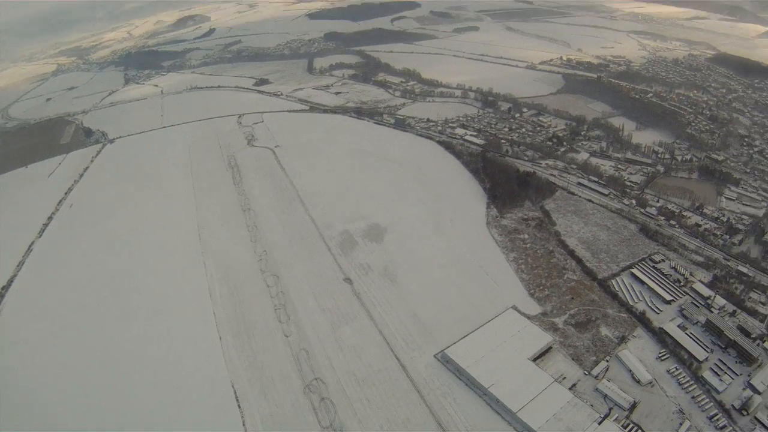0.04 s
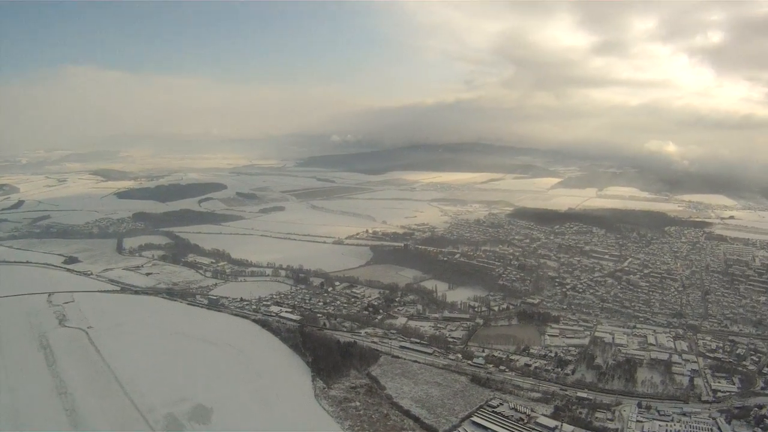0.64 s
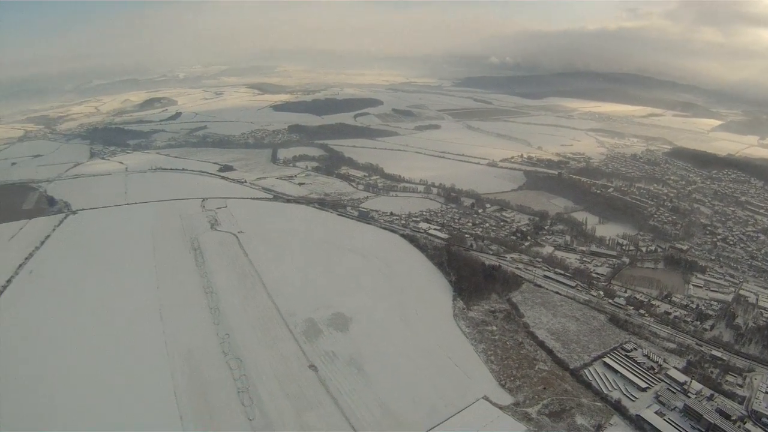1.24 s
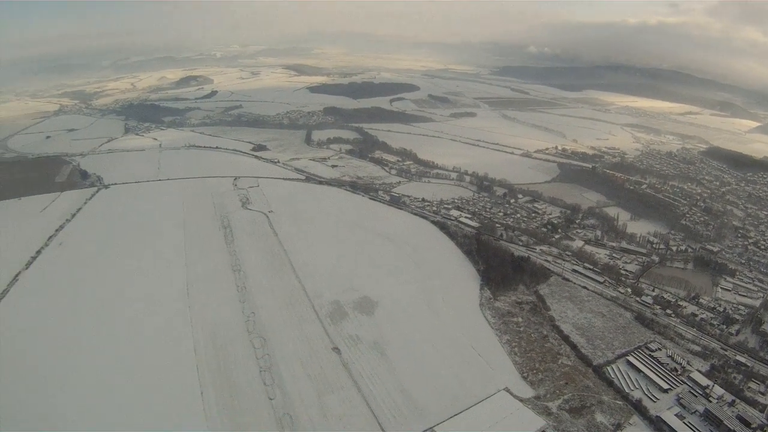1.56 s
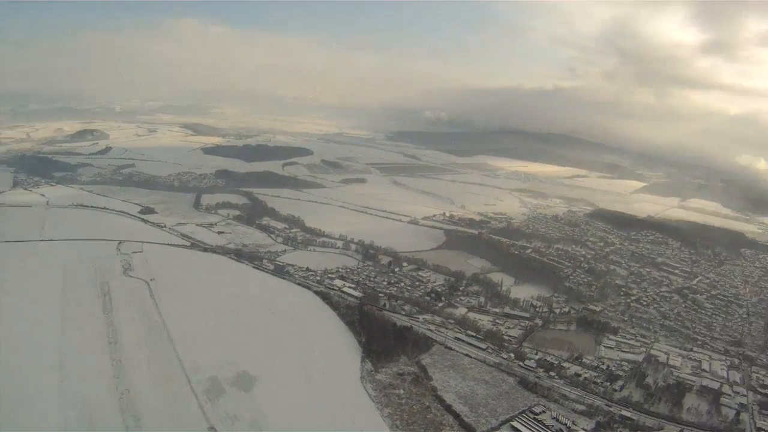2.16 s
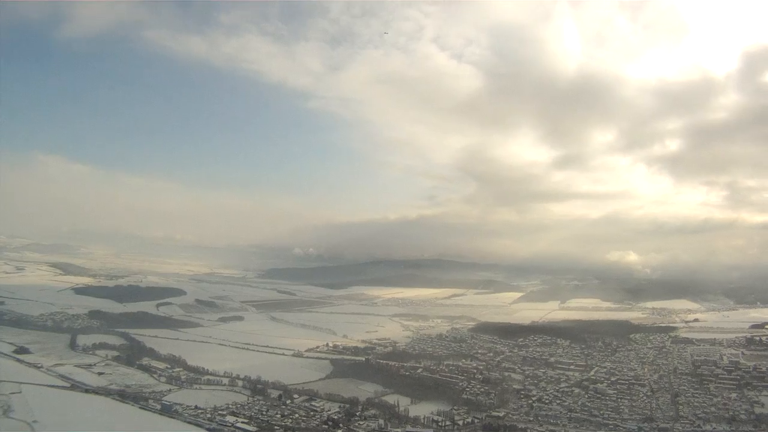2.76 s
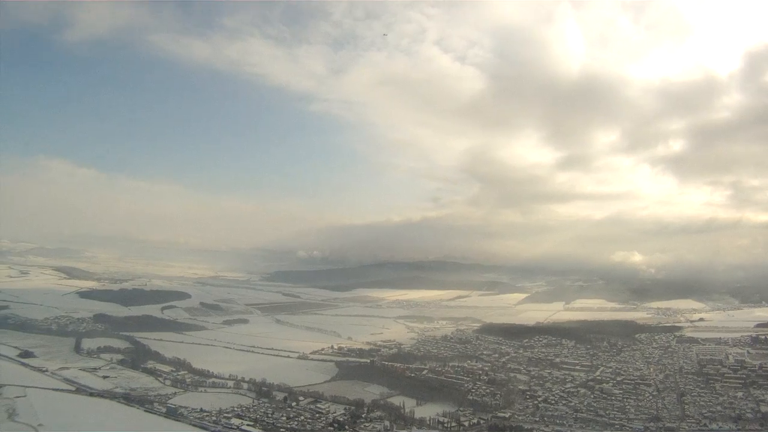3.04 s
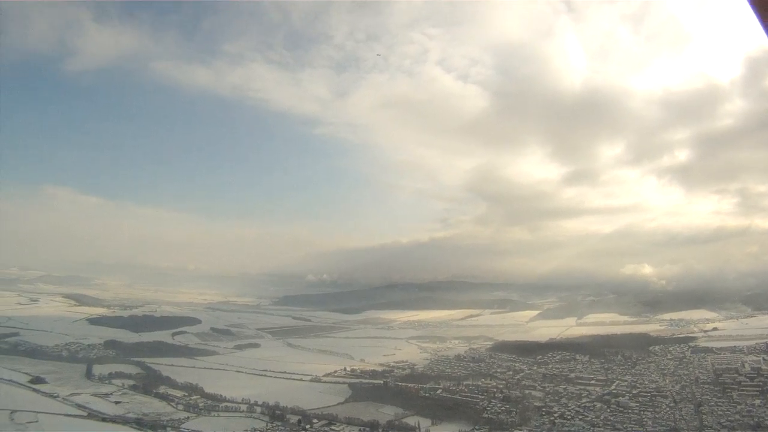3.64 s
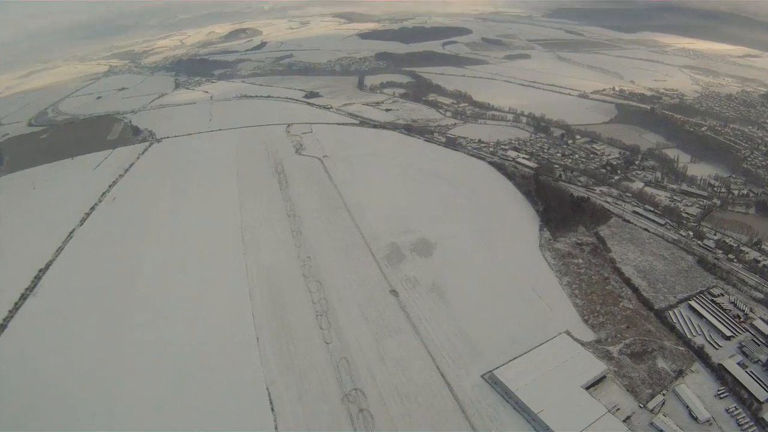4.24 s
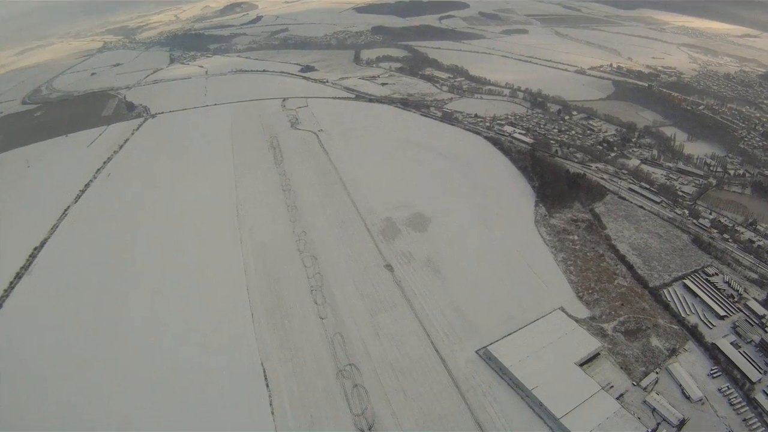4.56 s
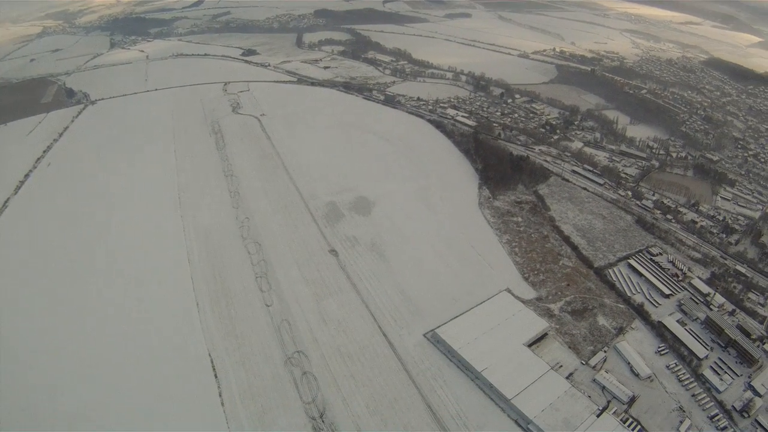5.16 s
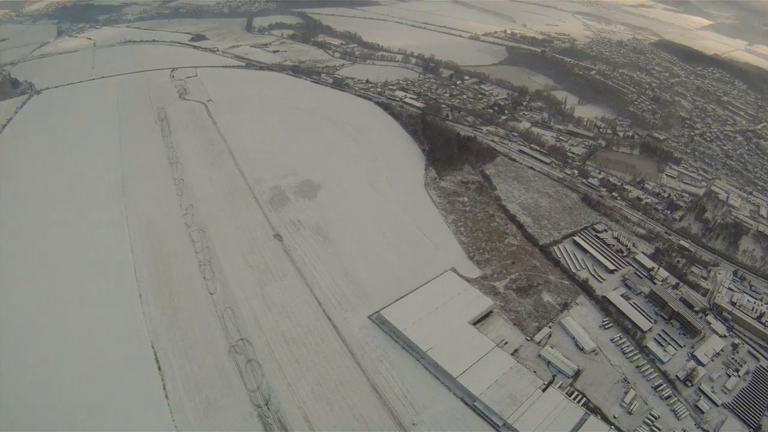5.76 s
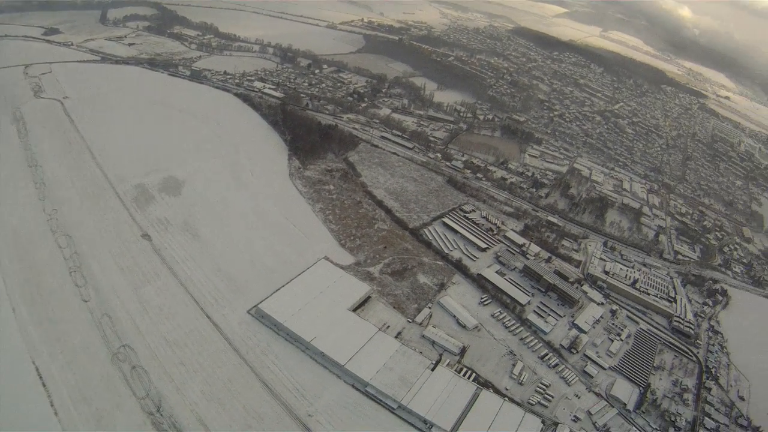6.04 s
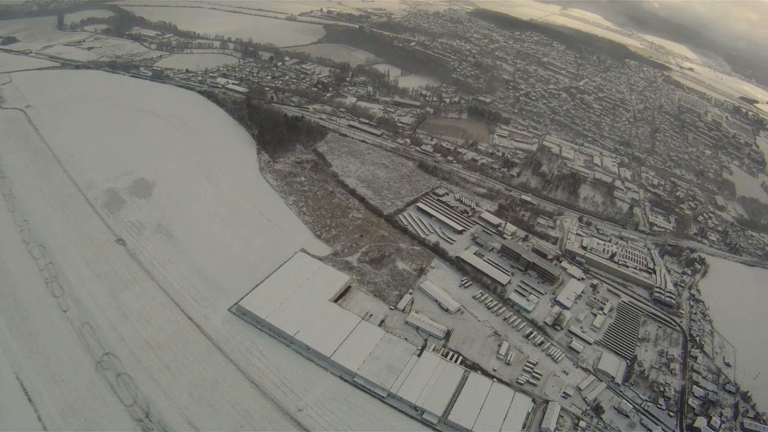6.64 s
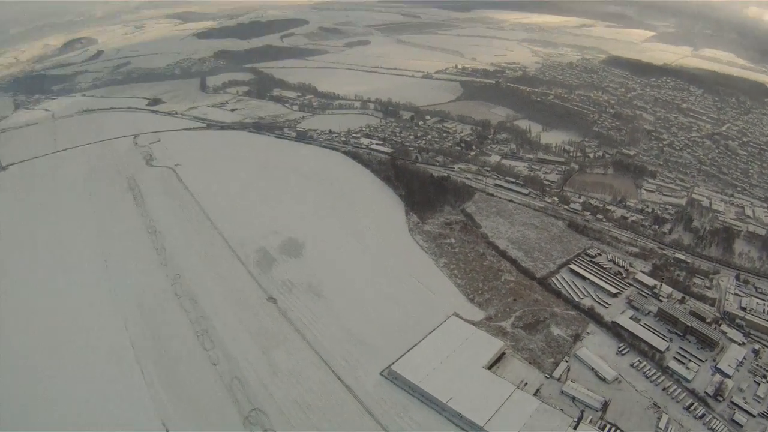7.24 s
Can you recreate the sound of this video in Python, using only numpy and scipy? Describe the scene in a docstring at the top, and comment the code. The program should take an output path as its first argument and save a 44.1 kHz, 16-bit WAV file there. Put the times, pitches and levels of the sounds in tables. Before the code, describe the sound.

High in the open air under a parachute, a low, even wind rumble and airy hiss are heard through a closed camera case on a helmet. A plastic clack comes early, followed by scuffing clothing, then two sharper clacks with small creaks and dull thumps. The air turns to a fuller, hollow rush before one last, lighter clack. A far aircraft engine hums very faintly, and the sound is slightly gritty.

```python
"""Wind rumbles on a helmet camera's closed case during a glide under an open parachute.
The air also hisses past, rushes through the case's hollows and whistles across a gap in the helmet.
As the head turns, the plastic mount creaks and clacks, clothing rustles and the helmet thumps.
A far aircraft drones faintly. The camera's slow sampling adds a thin grit to the nearly mono sound."""
import sys
import numpy as np
from scipy import signal
from scipy.fft import rfft, irfft, next_fast_len
from scipy.io import wavfile
from scipy.ndimage import uniform_filter1d, map_coordinates

SR = 44100
rng = np.random.default_rng(int(sys.argv[2]) if len(sys.argv) > 2 else 0)


def put_to_file(sound):
    """Save the sound as 16-bit audio at rate SR, in the file named by the first command-line argument."""
    columns = np.atleast_2d(sound).T  # one column per channel
    safe = np.clip(columns, -1, 1)
    whole_steps = np.round(safe * 32767)
    wavfile.write(sys.argv[1], SR, whole_steps.astype(np.int16))


N = 330750  # 7.5 seconds

# How hard swirls of air shake the case. Each row: time in seconds, relative level in dB.
BUFFET_LEVELS = [(0.0, -55.5), (0.46, -49.5), (0.88, -55.5), (1.13, -50.5), (2.23, -50), (2.42, -53),
                 (3.74, -54.5), (4.07, -49.5), (5.37, -55), (6.12, -51.5), (6.56, -57), (7.5, -52.5)]
# The tone of the wind's rumble. Each row: frequency in Hz, relative level in dB.
RUMBLE_SPECTRUM = [(5, -1), (22, 1.5), (45, -0.5), (70, 0), (92, 1), (115, 3.5), (150, -7.5), (200, -11.5),
                   (260, -19), (400, -24), (800, -40.5), (2000, -78)]
# The tone of air hissing past. Each row: frequency in Hz, relative level in dB.
AIR_SPECTRUM = [(100, 1), (300, 2.5), (480, -2), (650, -2), (1000, -5), (1300, -7.5), (1800, -9),
                (2300, -8), (3000, -11.5), (3600, -11.5), (4500, -12), (5900, -18)]
# Air passing the hollows, strongest while the head looks down.
# Each row: time in seconds, relative level in dB.
RUSH_LEVELS = [(0, -64.5), (.5, -64.5), (.8, -72.5), (1.3, -69), (2.25, -67.5), (2.5, -71), (3.7, -74),
               (4.15, -63.5), (4.68, -62), (4.96, -54.5), (6.2, -57.5), (7.5, -60)]
# The resonances of the case's hollows. Each row: frequency in Hz, width in Hz, relative level in dB.
CAVITY_MODES = [(1134, 116, 4), (1306, 215, 0.5), (1612, 270, -4), (1970, 230, -8.5), (2330, 360, -10.5),
                (3780, 166, -16.5)]
# The resonance of the helmet's gap. The row: frequency in Hz, width in Hz, relative level in dB.
GAP_MODES = [(814, 55, 0)]
# Gusts across that gap. Each row: peak time in seconds, level in dB, seconds to rise 20 dB,
# seconds to fall 20 dB.
WHISTLE_GUSTS = [(.33, -63, 1.0, 0.2), (1.85, -64.5, 0.6, 0.6), (4.6, -63, 0.5, 4), (7.47, -68.5, 0.3, 6)]
# The mount takes load and scrapes, then eases. Each row: peak time in seconds, level in dB,
# seconds to rise 20 dB, seconds to fall 20 dB.
MOUNT_SLIDES = [(.41, -54.5, 0.58, 0.2), (1.85, -65, 0.3, 0.8), (2.321, -53, 0.17, 0.16),
                (4.11, -55.5, 0.17, 0.35), (4.55, -63.5, .5, 1.3), (6.04, -56, 0.2, 0.63)]
# The scraping mount's resonances. Each row: frequency in Hz, width in Hz, relative level in dB.
CREAK_MODES = [(500, 59, 0), (820, 114, -8.5), (1455, 210, -3), (2035, 163, 1), (2270, 190, -1),
               (3800, 320, -32)]
# The mount lets go, catches and bounces. Each row: time in seconds, level in dB, pitch ratio,
# change to the low tones in dB, attack in seconds, lead-in tick in dB relative to the blow,
# seconds between bounces, loss per bounce in dB.
MOUNT_CLACKS = [(.320, -40, 1.11, -2, 0.00032, -14, .0078, 16),
                (0.4734, -25, 1.01, -6, 0.0009, -9, .0068, 9),
                (0.5024, -39.5, 0.95, -8, .0005, -12, 0.0047, 8),
                (.866, -46, 0.995, -4, 0.00045, -16, .0039, 16),
                (2.345, -20, 1.04, -1.5, 0.00049, -6, .0046, 3.5),
                (4.0843, -18, 1, 2.5, 0.00025, -32, 0.013, 15),
                (7.461, -32, 1.04, -1, .00025, -21, 0.026, 10)]
# The ring of the plastic mount. Each row: frequency in Hz, relative level in dB, seconds to fade 60 dB.
PLASTIC_MODES = [(515, -30, 0.069), (728, -32, 0.063), (856, -29, 0.069), (1147, -27, 0.11),
                 (1265, -43, 0.076), (1600, -14, 0.03), (1944, -9, 0.016), (2062, 0.5, 0.017),
                 (2264, -4, 0.018), (2554, -8.5, 0.013), (3870, 1.5, 0.016)]
# Clothing brushes the helmet. Each row: start in seconds, length in seconds, relative level in dB.
CLOTH_STROKES = [(0.918, 0.2, -64), (1.13, 0.523, -60), (1.76, 0.5, -62.5), (3.274, 0.037, -65.5),
                 (4.17, 0.12, -54)]
# Single catches of the cloth. Each row: time in seconds, relative level in dB.
CLOTH_SCUFFS = [(0.7257, -52.5), (0.9058, -53), (1.0201, -48.5), (1.1345, -40), (1.2276, -42.5),
                (1.329, -43), (1.3825, -45.5), (1.4122, -41.5), (1.492, -46), (1.5663, -41.5),
                (1.5838, -40.5), (1.62, -40.5), (1.6571, -43), (1.6734, -43), (2.0554, -39), (2.129, -53),
                (2.1769, -35.5), (3.3155, -50.5), (4.1776, -36.5), (4.2213, -42), (4.3097, -40.5)]
# Dull bumps of the helmet. Each row: start in seconds, level in dB, frequency in Hz.
HELMET_THUMPS = [(0.475, -32.5, 80), (2.337, -34, 35.2), (2.345, -32, 92), (3.277, -35.5, 55.5),
                 (4.087, -36, 94), (4.174, -29.5, 105), (4.307, -38.5, 96), (6.045, -35.5, 117),
                 (6.946, -38, 105), (7.416, -39, 97)]
# The far engine. Each row: time in seconds, firing rate in Hz, relative level in dB.
ENGINE_COURSE = [(0, 89.47, -59.5), (2, 91.3, -59.5), (4, 92.24, -59.5), (5.5, 92.5, -57),
                 (7.5, 94.1, -55.5)]
# The engine's tones. Each row: multiple of the firing rate, relative level in dB.
ENGINE_HARMONICS = [(1, -5), (2, -9), (3, -14.5), (4, -20.5), (5, -19), (6, -24), (7, -27.5), (9, -33)]
# The tone of the camera's own hiss. Each row: frequency in Hz, relative level in dB.
HISS_SPECTRUM = [(59, -64), (100, -47), (274, -3.5), (733, 4), (1210, -17.5), (2130, -0.5), (5040, 2),
                 (5960, -19), (7050, 2), (11700, -31), (15000, -27)]


def wind():
    """Swirls of air shake the case; the same flow hisses past and sounds the hollows and the gap."""
    buffet_db, = curves(BUFFET_LEVELS)
    rush_db, = curves(RUSH_LEVELS)
    gust_db = .5 * wobble(9) + .5 * wobble(40)  # the stream is even, so it swells only a little
    shaking = amp(buffet_db + 2.12 + gust_db + .4 * wobble(11))  # the swirls are lumpier
    rumble = shaking * coloured(rng.standard_normal(N), RUMBLE_SPECTRUM)
    air = amp(-62.5 + .5 * gust_db) * coloured(turbulence(patchy_db=0.94), AIR_SPECTRUM)
    rush = amp(rush_db - 0.4 + gust_db) * unit(resonate(turbulence(patchy_db=1.6), CAVITY_MODES))
    gap_flow = sum(swell(*gust) for gust in WHISTLE_GUSTS)
    whistle = gap_flow * unit(resonate(rng.standard_normal(N), GAP_MODES))
    return rumble + air + rush + whistle


def turbulence(patchy_db):
    """Churning air: noise whose strength drifts in patches of time and frequency."""
    spectrum = signal.stft(rng.standard_normal(N), nperseg=512)[2]
    patches = uniform_filter1d(rng.standard_normal(spectrum.shape), size=5, axis=0)  # across frequency
    patches = uniform_filter1d(patches, size=12, axis=1)  # across time
    return unit(signal.istft(spectrum * amp(patchy_db * unit(patches)), nperseg=512)[1][:N])


def mount_creaks():
    """The plastic joint scrapes in tiny slips under load, and the air's drag keeps it rubbing."""
    rush_db, = curves(RUSH_LEVELS)
    sliding = sum(swell(*slide) for slide in MOUNT_SLIDES)
    drag = amp(rush_db - 10)
    load = np.hypot(sliding, drag) * amp(2.1 * wobble(45))
    return load * unit(resonate(friction(per_second=3000, spread_db=0.5), CREAK_MODES))


def mount_clacks(low_tones_hz=1800, crack_fade_s=0.0055):
    """Each touch snaps and rings the plastic; a glancing blow rings the low tones only weakly."""
    out = np.zeros(N)
    t = np.arange(SR // 12) / SR
    # The closed case passes little above 2350 Hz, so the clacks sound round and hollow.
    case = signal.butter(7, 2350, fs=SR, output="sos")
    for start, db, pitch, low_db, attack_s in mount_touches():
        pitch += rng.normal(0, .022)
        ring = np.zeros(len(t))
        for hz, mode_db, fade_s in PLASTIC_MODES:
            level_db = mode_db + low_db * (hz < low_tones_hz) + rng.normal(0, 1.5)
            ring += amp(level_db - 60 * t / fade_s) * np.sin(2 * np.pi * hz * pitch * t)
        ring = signal.sosfilt(case, ring * (1 - np.exp(-t / attack_s)))
        crack = amp(-30 - 60 * t / crack_fade_s) * rng.standard_normal(len(t))
        add(out, start, amp(db) * (ring / np.abs(ring).max() + crack))
    return out


def mount_touches(lead_s=0.001926):
    """One clack is four quick touches: a lead-in tick, the blow and two weaker bounces."""
    for start, db, pitch, low_db, attack_s, lead_db, gap_s, loss_db in MOUNT_CLACKS:
        yield start - lead_s, db + lead_db, pitch, low_db, attack_s
        for bounce in range(3):
            yield start + bounce * gap_s, db - bounce * loss_db, pitch, low_db, attack_s


def cloth_rustle(attack_s=0.00076, fade_s=.033):
    """Fabric rubs and catches in clumps of tiny slips, heard through the case."""
    force = cloth_pressure() * amp(-1.5 + 2.5 * wobble(55))
    t = np.arange(SR // 10) / SR
    scuff = amp(-2.5 - 60 * t / fade_s) * (1 - np.exp(-t / attack_s))
    for start, db in CLOTH_SCUFFS:
        add(force, start - .001, amp(db) * scuff)
    slips = friction(per_second=7000, spread_db=3.0)
    return through_case(force * slips) / np.std(through_case(slips))


def cloth_pressure():
    """How hard the clothing presses on the helmet, as a gain."""
    strokes = [swell(start, db, rise_s=.1, fall_s=0.079, hold_s=length)
               for start, length, db in CLOTH_STROKES]
    return np.max(strokes, axis=0)


def through_case(slips, bright_hz=2700, wall_hz=4400):
    """Dry slips sound the hollows more brightly than air does, until the case wall muffles them."""
    bright = filtered(resonate(slips, CAVITY_MODES), lambda hz: 1 + 1j * hz / bright_hz)
    rasp = resonate(slips, [(3800, 320, -13.5)])
    wall = signal.butter(4, wall_hz, fs=SR, output="sos")
    return signal.sosfilt(wall, bright + rasp)


def helmet_thumps(sway_hz=45, rise_s=0.0062):
    """The helmet sways under the rubbing cloth, and each bump rocks it briefly."""
    sway = unit(filtered(rng.standard_normal(N), lambda hz: 1 / (1 + (hz / sway_hz) ** 4)))
    out = amp(6.5) * cloth_pressure() * sway
    t = np.arange(SR // 6) / SR
    bump = t / rise_s * np.exp(1 - t / rise_s)
    for start, db, hz in HELMET_THUMPS:
        add(out, start, -amp(db) * bump * np.sin(2 * np.pi * hz * t))
    return out


def far_aircraft():
    """A far engine creeps up in pitch; each of its tones fades on its own in the moving air."""
    firing_hz, engine_db = curves(ENGINE_COURSE)
    phase = 2 * np.pi * np.cumsum(firing_hz * (1 + 0.003195 * wobble(7))) / SR
    drone = np.zeros(N)
    for multiple, db in ENGINE_HARMONICS:
        strength = np.sqrt(2) * amp(db + 1.9 * wobble(4))
        drone += strength * np.sin(multiple * phase + rng.uniform(0, 2 * np.pi))
    return amp(engine_db) * drone


def friction(per_second, spread_db):
    """Tiny slips at random moments and of random sizes."""
    hits = rng.random(N) < per_second / SR
    return unit(hits * rng.standard_normal(N) * amp(spread_db * rng.standard_normal(N)))


def swell(peak_s, db, rise_s, fall_s, hold_s=0):
    """A gain that climbs to db, holds, then dies away; rise and fall are seconds per 20 dB."""
    t = np.arange(N) / SR - peak_s
    return amp(db - 20 * np.maximum(-t, 0) / rise_s - 20 * np.maximum(t - hold_s, 0) / fall_s)


def amp(db):
    """Turn decibels into a gain."""
    return 10 ** (np.asarray(db) / 20)


def unit(x):
    """Scale a signal to an average (rms) level of 1."""
    return x / np.sqrt(np.mean(x ** 2) + 1e-20)


def curves(rows):
    """Join a table's rows with straight lines: one curve for each column after the time."""
    times, *columns = np.transpose(rows)
    return [np.interp(np.arange(N) / SR, times, column) for column in columns]


def wobble(rate):
    """A smooth curve through `rate` random values a second."""
    return map_coordinates(rng.standard_normal(int(N * rate / SR) + 4), [np.arange(N) * rate / SR])


def filtered(x, response):
    """Multiply each frequency in x by response(hz)."""
    size = next_fast_len(N + SR // 2)
    return irfft(rfft(x, size) * response(np.fft.rfftfreq(size, 1 / SR)), size)[:N]


def coloured(x, spectrum):
    """Shape the tone of x with a spectrum table, then scale it to level 1."""
    points_hz, db = np.transpose(spectrum)
    return unit(filtered(x, lambda hz: amp(np.interp(np.log(hz + 1), np.log(points_hz), db))))


def resonate(x, modes):
    """Pass x through resonances, added with alternating signs."""
    def response(hz):
        return sum((-1) ** k * amp(db) * 1j * hz * width / (centre ** 2 - hz ** 2 + 1j * hz * width)
                   for k, (centre, width, db) in enumerate(modes))
    return filtered(x, response)


def add(track, start_s, sound):
    """Mix a sound into a track, beginning at start_s."""
    part = track[round(start_s * SR):][:len(sound)]
    part += sound[:len(part)]


def scene():
    """Everything reaches one microphone inside the case."""
    mono = wind() + cloth_rustle() + mount_creaks() + mount_clacks() + helmet_thumps() + far_aircraft()
    return np.array([mono, mono])


def record(dry):
    """The camera samples slowly and holds each value, mirroring the sound into a thin, gritty treble."""
    band_hz, sample_hz, top_hz = 5700, 12000, 15500
    band = filtered(dry[0], lambda hz: 1 / np.sqrt(1 + (hz / band_hz) ** 50))
    slow = signal.resample(band, round(N * sample_hz / SR))
    held = signal.resample(np.repeat(slow, 4), N)
    # A faint electronic hiss is all that sets left and right apart.
    hiss = amp(-80) * coloured(rng.standard_normal(N), HISS_SPECTRUM)
    return np.array([filtered(side, lambda hz: hz < top_hz) for side in (held + hiss, held - hiss)])


dry = scene()
out = record(dry)
put_to_file(out)
```